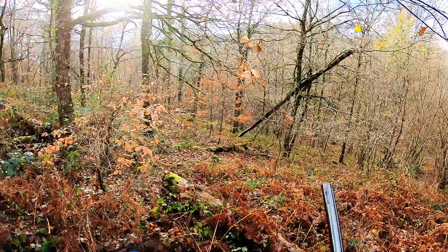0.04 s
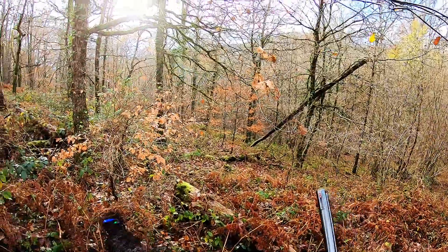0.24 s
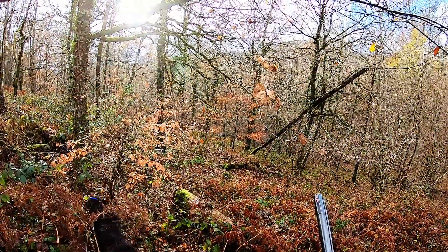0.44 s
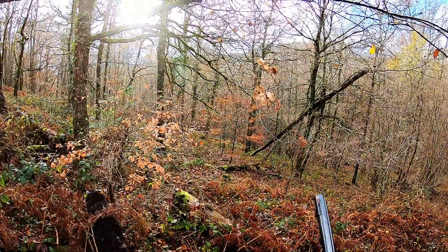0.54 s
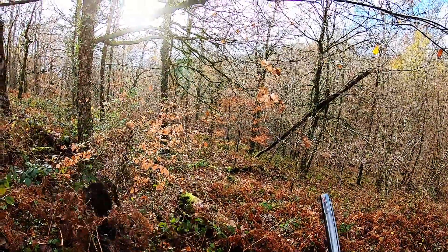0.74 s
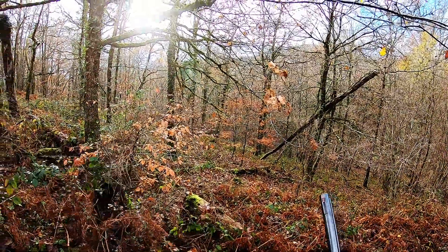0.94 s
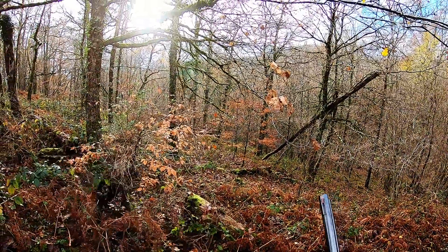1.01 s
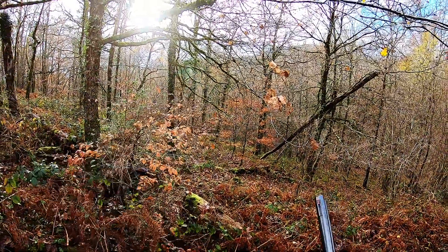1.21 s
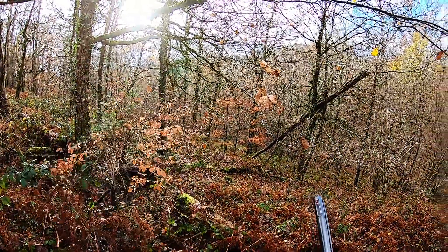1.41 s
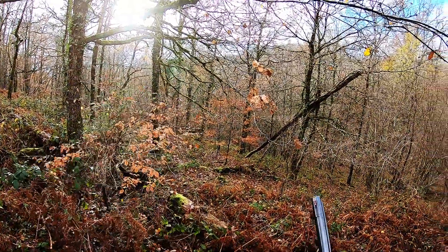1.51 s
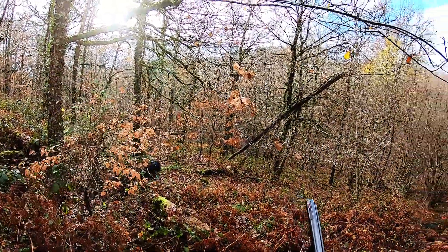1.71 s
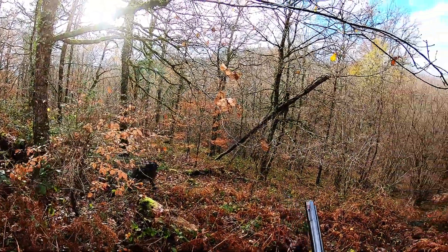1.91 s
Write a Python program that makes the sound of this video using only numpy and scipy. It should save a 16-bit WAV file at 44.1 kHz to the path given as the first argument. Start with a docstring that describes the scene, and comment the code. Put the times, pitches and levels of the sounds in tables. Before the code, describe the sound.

A dog's collar bell clatters unevenly, moving from the right of the microphone to about the centre, then softening with distance. Beneath it, paws crunch dry bracken and crack twigs, with a faint echo from the quiet woods.

```python
"""A still wood, in stereo. A dog with a sheet-metal bell on its collar trots away through dry bracken,
crossing from the right of the microphone to a little left of centre. The clapper knocks and skitters
with each stride; the bell hums, swings and is damped by the fur. Paws crush leaves, thud and snap
twigs, the bass bumps softly twice, and the trunks scatter a faint echo."""
import sys
import numpy as np
from scipy import signal
from scipy.fft import rfft, irfft, next_fast_len
from scipy.io import wavfile

SR = 44100
rng = np.random.default_rng(int(sys.argv[2]) if len(sys.argv) > 2 else 0)


def pcm_store(signal):
    """Save signal as 16-bit PCM."""
    levels = np.round(np.clip(np.atleast_2d(signal), -1, 1) * 32767)
    wavfile.write(sys.argv[1], SR, levels.astype(np.int16).T)


N = 85995
TIME = np.arange(N) / SR


def amp(db):
    """Decibels to gain."""
    return 10 ** (np.asarray(db) / 20)


def unit(x):
    """Scales to rms 1."""
    return x / np.sqrt(np.mean(x ** 2) + 1e-20)


def read(points, hz):
    """Reads a curve on a log frequency axis."""
    f, value = np.transpose(points)
    return np.interp(np.log(hz + 1), np.log(f + 1), value)


def fall(t, t60):
    """Exponential decay, 60 dB in t60 seconds."""
    return np.exp(-np.log(1000) * t / t60)


def add(mix, s, sound):
    """Mixes a sound in at s seconds."""
    part = mix[round(s * SR):][:len(sound)]
    part += sound[:len(part)]


def drift(rate_hz):
    """Slow random wander of rms 1."""
    size = next_fast_len(N)
    smoothing = np.exp(-(np.fft.rfftfreq(size, 1 / SR) / rate_hz) ** 2)
    return unit(irfft(rfft(rng.standard_normal(size)) * smoothing, size)[:N])


def colour(pair, spectrum):
    """Gives two unrelated noises a spectrum (rows of Hz, dB) and the stereo width of the wood."""
    # Each row: frequency in Hz, left-right likeness at the microphone from 0 to 1.
    likeness = [(30, 0.039), (150, 0.83), (1000, 0.89), (2500, 0.55), (5000, 1), (8000, 0)]
    hz, (a, b) = np.fft.rfftfreq(N, 1 / SR), rfft(pair)
    same = read(likeness, hz)
    mid, side = a * np.sqrt(1 + same), b * np.sqrt(1 - same)
    return unit(irfft(np.array([mid + side, mid - side]) * amp(read(spectrum, hz)), N))


def noise(spectrum):
    """Coloured stereo noise of rms 1."""
    return colour(rng.standard_normal((2, N)), spectrum)


def woodland_air():
    """The faint, steady hush of still air among the trees."""
    # Each row: frequency in Hz, relative level in dB.
    spectrum = [(20, -4), (110, -16.5), (160, 2), (430, -6.5), (4000, -15.5), (8000, -3), (11000, -23),
                (15500, -30)]
    return amp(-62) * noise(spectrum)


def undergrowth():
    """Dry leaves crackle under paws and along flanks; the ground's thud fades as the dog leaves."""
    # Leaves being crushed. Each row: peak time in seconds, level in dB, rise and decay in seconds.
    steps = [(0.011, -44, 0.023, 0.027), (0.132, -40.5, 0.0037, 0.077), (0.403, -40, 0.021, 0.016),
             (.462, -38, 0.043, 0.032), (0.656, -43.5, 0.026, 0.022), (.877, -43, 0.026, 0.026),
             (0.916, -35.5, 0.0073, 0.027), (0.984, -43.5, 0.0055, 0.031), (1.212, -35, 0.0024, 0.039),
             (1.243, -29.5, 0.0093, 0.0035), (1.585, -47, 0.029, 0.033), (1.764, -47, 0.0044, 0.02),
             (1.893, -47.5, 0.018, 0.011)]
    # Continuous rustle. Each row: time in seconds, level in dB.
    rustle = [(0, -81), (.1, -57.5), (.2, -51), (1.3, -48.5), (1.53, -58), (1.64, -62), (1.8, -58),
              (1.95, -57)]
    # Spectra of leaves and ground. Each row: frequency in Hz, relative level in dB.
    leaf_spectrum = [(100, -24), (170, -10.5), (900, 3.5), (3500, 5), (8000, -2), (10000, -9.5),
                     (15500, -43)]
    thud_spectrum = [(40, -27), (110, -18), (160, -2), (280, 2.5), (420, -3.5), (700, -3), (2000, -29)]
    thud_db, thud_db_per_s, thud_decay_s, crackles_per_s = -9.5, -14, 0.094, 1500
    leaf_power = amp(np.interp(TIME, *np.transpose(rustle))) ** 2
    thud = np.zeros(N)
    for s, db, rise, decay in steps:
        crush = np.exp(-np.maximum((s - TIME) / rise, (TIME - s) / decay))
        leaf_power += (amp(db) * crush) ** 2
        weight = np.exp(-np.maximum((s - TIME) / rise, (TIME - s) / thud_decay_s))
        thud += amp(db + thud_db + thud_db_per_s * s) * weight
    grain_db = 5 * np.minimum(rng.exponential(1, (2, N)), 4)
    sizes = amp(grain_db) * rng.choice([-1, 1], (2, N))
    grains = unit(sizes * (rng.random((2, N)) < crackles_per_s / SR))
    leaves = colour(amp(-2.5) * grains + rng.standard_normal((2, N)), leaf_spectrum)
    return np.sqrt(leaf_power) * leaves + thud * noise(thud_spectrum)


def bell_hum(starts, levels_db):
    """Each strike feeds one wavering tone that dips as the bell swings and chokes in the dog's fur."""
    # Fur presses on the bell. Each row: start and end in seconds.
    muffled = [(0.298, 0.37), (0.443, 0.5), (0.826, 1.01), (1.11, 1.24), (1.337, 1.65), (1.682, 1.816),
               (1.856, 2.05)]
    hum_hz, free_t60, muffled_t60 = 1092, 0.65, 0.055
    turns_s = (.257, .35, .415, .61, .745)  # the bell turns a silent side to the microphone
    pushes = np.zeros(N)
    pushes[(starts * SR).astype(int)] = amp(levels_db)
    in_fur = np.any([(TIME > begin) & (TIME < end) for begin, end in muffled], 0)
    loss = np.cumsum(np.log(1000) / np.where(in_fur, muffled_t60, free_t60)) / SR
    swell = np.exp(-loss) * np.cumsum(pushes * np.exp(loss))  # each push decays from its own start
    facing = np.prod([np.tanh((TIME - s) / 0.016) for s in turns_s], 0)
    pitch_hz = hum_hz * (1 + 0.00537 * drift(22.3))
    return np.sqrt(2) * swell * facing * np.sin(2 * np.pi * np.cumsum(pitch_hz) / SR)


def wall_ring(modes, levels_db, hits):
    """Each touch of the clapper feeds the wall modes, which swell, waver and shimmer as the bell swings."""
    contact_s, chatter_db = .0008, -8
    in_step_hz = 5800  # modes well below this build up smoothly under the chatter; higher ones flutter
    contact_pole = np.exp(-1 / (contact_s * SR))
    at = (hits * SR).astype(int)
    touch_db = levels_db[:, None] + chatter_db * (np.arange(hits.shape[1]) > 0)
    out = np.zeros((2, N))
    for hz, db, t60 in modes:
        strength = amp(db + touch_db + rng.uniform(-4, 0, at.shape))
        phase = 2 * np.pi * rng.random(at.shape) * min(hz / in_step_hz, 1) ** 2
        push = np.zeros(N, complex)
        push[at] = strength * np.exp(1j * phase)
        swell = signal.lfilter([1 - contact_pole], np.poly([fall(1 / SR, t60), contact_pole]), push)
        pitch_hz = hz * (1 + .0048 * drift(33.1))
        height = (hz / 7860) ** 2  # higher modes shimmer more and differ more between left and right
        shimmer = 1 + 0.92 * height * drift(177)
        ring = swell * shimmer * np.exp(2j * np.pi * np.cumsum(pitch_hz) / SR)
        apart_radians = 0.75 * min(height, 1) * (1 + drift(30) / 2)
        out += [(ring * np.exp(1j * side * apart_radians)).real for side in (1, -1)]
    radiation = signal.butter(2, 1860, "high", fs=SR, output="sos")  # the wall ring is kept above about 2 kHz
    return signal.sosfilt(radiation, out)


def bell():
    """The clapper hits and chatters on sheet metal: a clack, a hollow knock, hum, ring and a scrape."""
    # Each row: start in seconds, then levels in dB of knock, hum, middle ring, bright ring, clink, ping.
    strikes = [ (.207, -28, -30.5, -30, -27, -28, -29.5), (.269, -36, -33.5, -21, -29, -29, -17.5),
               (.281, -23, -36, -32.5, -23.5, -21.5, -16), (.295, -21.5, -20, -35.5, -16.5, -26, -39),
               (.321, -48, -72, -61, -33, -17, -46), (0.367, -29, -26.5, -44, -30, -38, -45),
               (.425, -25.5, -32, -31, -26, -31, -29.5), (.499, -22.5, -31.5, -30, -27.5, -36, -27.5),
               (0.53, -41, -56, -28.5, -25.5, -31, -20), (.554, -36, -34, -27.5, -27, -27, -26),
               (.576, -54, -54, -28, -32, -51, -35), (.664, -24, -55, -47, -32, -40, -44),
               (0.6752, -31, -89, -32, -21, -17, -22.5), (.703, -24.5, -45.5, -39, -47, -26, -31),
               (.823, -22, -30.5, -40.5, -44.5, -30, -44), (.834, -37, -39, -35.5, -38, -44, -42.5),
               (1.005, -20, -37.5, -33.5, -23, -33, -25.5), (1.020, -24.5, -39.5, -30.5, -26, -48, -38),
               (1.044, -47, -41, -30, -48, -47, -46), (1.109, -22, -34, -35.5, -31, -34, -37),
               (1.133, -23, -31.5, -37, -24, -19, -25.5), (1.182, -33.5, -58, -39, -37, -45, -34.5),
               (1.229, -16, -38, -50, -20.5, -21.5, -26.5), (1.242, -21, -27.5, -22, -22.5, -37, -24.5),
               (1.313, -28, -62, -34.5, -21.5, -33, -27), (1.328, -22, -43, -40, -32.5, -24, -31),
               (1.358, -29, -73, -64, -31, -37.5, -41), (1.475, -32.5, -38, -42.5, -49, -49, -66),
               (1.531, -35.5, -46, -49, -49.5, -54, -67), (1.653, -33, -38, -37, -36, -38, -39),
               (1.66, -39, -59, -34, -29, -34, -32.5), (1.772, -34, -43, -37.5, -34, -35, -38),
               (1.789, -35, -66, -47, -36, -28, -35), (1.811, -63, -44, -51, -36.5, -39, -38)]
    # Modes of the hollow body, then four families of wall modes, each fed by how squarely the clapper
    # meets it. Each row: frequency in Hz, relative level in dB, t60 in seconds.
    cavity = [(850, -17, .05), (915, -7.5, .07), (1015, -8, .04), (1142, -8, .05)]
    middle = [(2886, -13, 0.19), (2933, -12, 0.11)]
    bright = [(5268, -8, 0.16), (5436, -16.5, 0.21), (5570, -11.5, 0.21), (8770, -23.5, 0.33),
              (9100, -23, 0.26), (10440, -24, 0.086), (12900, -31, 0.054)]
    clink = [(6020, -8, 0.1)]
    ping = [(7125, -11, 0.24), (7527, -10, 0.18)]
    # The clapper's scrape. Each row: frequency in Hz, relative level in dB.
    scrape_spectrum = [(400, -41), (1300, -16), (4500, 0.5), (6000, 7), (7600, 3), (10000, -1.5),
                       (13500, -12), (15500, -20)]
    touches, chatter_s, rise_s, clack_s = 5, .014, 0.001, .004
    starts, _, hum_db, *wall_db = np.transpose(strikes)
    later = np.sort(rng.random((len(starts), touches)), 1)
    hits = starts[:, None] + chatter_s * (later - later[:, :1])
    t = TIME[:SR]
    knocks, scrape, clack = np.zeros((3, N))
    contact = 1 - np.exp(-t / rise_s)
    for s, knock_db, _, middle_db, *treble_db in strikes:
        add(clack, s, amp(middle_db - 8) * np.exp(-t / clack_s))
        for hz, db, t60 in cavity:
            pitch_hz = hz * (1 + 0.02 * rng.standard_normal())  # depends on how fur covers the cavity
            knock = contact * fall(t, t60) * np.sin(2 * np.pi * pitch_hz * t)
            add(knocks, s, amp(knock_db + db) * knock)
        add(scrape, s, amp(np.mean(treble_db) - 11.5) * contact * fall(t, t60=0.11))
    radiation = signal.butter(2, (828, 1280), "band", fs=SR, output="sos")
    body = signal.sosfilt(radiation, knocks + bell_hum(starts, hum_db))
    walls = sum(wall_ring(modes, db, hits) for modes, db in zip((middle, bright, clink, ping), wall_db))
    clack_band = signal.butter(2, (1400, 4800), "band", fs=SR)
    clack_noise = unit(signal.lfilter(*clack_band, rng.standard_normal(N)))
    return body + walls + scrape * noise(scrape_spectrum) + clack * clack_noise


def bumps():
    """Two short, soft pushes of bass."""
    pitch_hz, width_s = 76, .016
    out = np.zeros(N)
    for s, db in ((.59, -65.5), (1.241, -56.5)):
        t = TIME - s
        out += amp(db) * np.exp(-(t / width_s) ** 2) * np.sin(2 * np.pi * pitch_hz * t)
    return out


def twigs():
    """Twigs snap under the paws with brief, dry cracks."""
    # Each row: start in seconds, level in dB, centre frequency in Hz.
    snaps = [(.655, -23.5, 3020), (0.787, -34.5, 6300), (0.9186, -34, 2480), (1.2428, -24, 1370),
             (1.895, -37.5, 2570)]
    decay_s, band_ratio = .002, 1.35
    out, t = np.zeros(N), TIME[:SR // 50]
    for s, db, hz in snaps:
        band = signal.butter(3, [hz / band_ratio, hz * band_ratio], "band", fs=SR)
        crack = signal.lfilter(*band, rng.standard_normal(len(t)) * np.exp(-t / decay_s))
        add(out, s, amp(db) * crack / abs(crack).max())
    return out


def trunk_echo(sound):
    """Sparse echoes from trunks, each band dying at its own speed."""
    # Each row: frequency in Hz, t60 in seconds.
    decay_times = [(200, 0.41), (5000, 0.45), (12000, 0.52)]
    echoes_per_s, gap_s = 1500, .004
    taps = rng.standard_normal((2, SR)) * (rng.random((2, SR)) < echoes_per_s / SR) * (TIME[:SR] > gap_s)
    hz, t, bands = signal.stft(taps, SR, nperseg=256)
    tail = signal.istft(bands * fall(t, read(decay_times, hz)[:, None]), SR, nperseg=256)[1]
    return signal.fftconvolve(sound, tail / np.linalg.norm(tail[0]), axes=1)[:, :N]


def scene():
    """The dog crosses in front of the microphone, with the wood's echo and air around it."""
    # The dog's path. Each row: time in seconds, left minus right in dB.
    path = [(0, -5.6), (.35, 1.1), (.85, 2.5), (1.95, 0)]
    pan_db = np.interp(TIME, *np.transpose(path))
    dog = (bell() + undergrowth() + twigs()) * amp(np.array([pan_db, -pan_db]) / 2)
    return dog + amp(-10.5) * trunk_echo(dog) + bumps() + woodland_air()


def record(dry):
    """The recorder's band ends at 15.5 kHz."""
    lowpass = signal.firwin(511, 15500, window=("kaiser", 9), fs=SR)
    return signal.oaconvolve(dry, lowpass[None], "same")


dry = scene()
out = record(dry)
pcm_store(out)
```